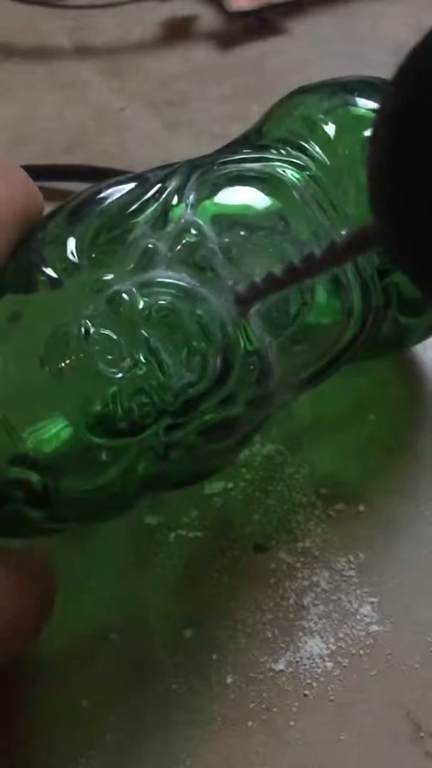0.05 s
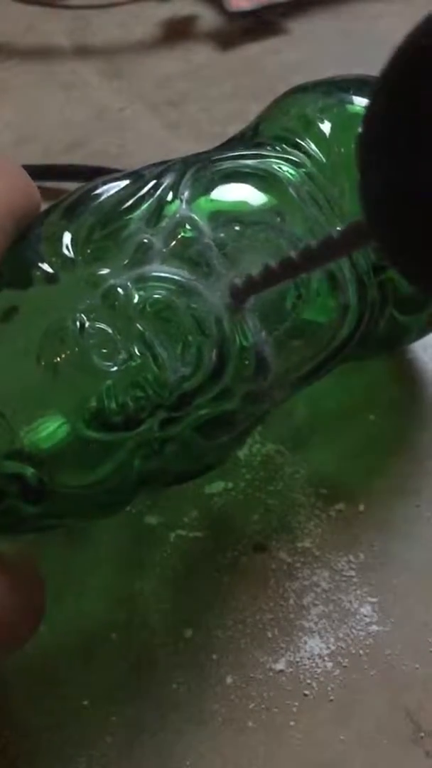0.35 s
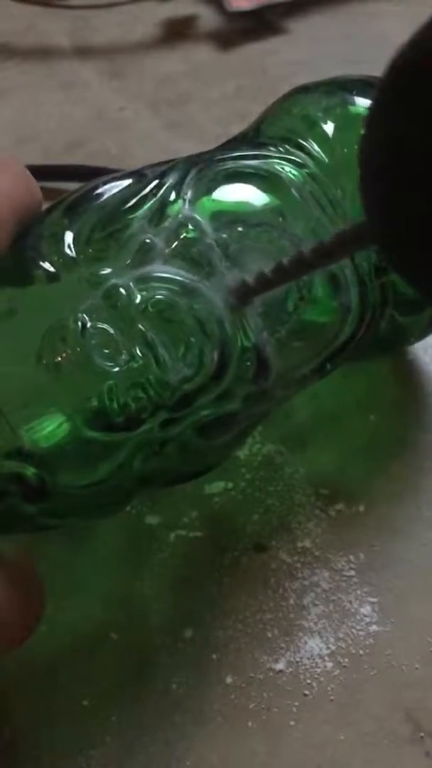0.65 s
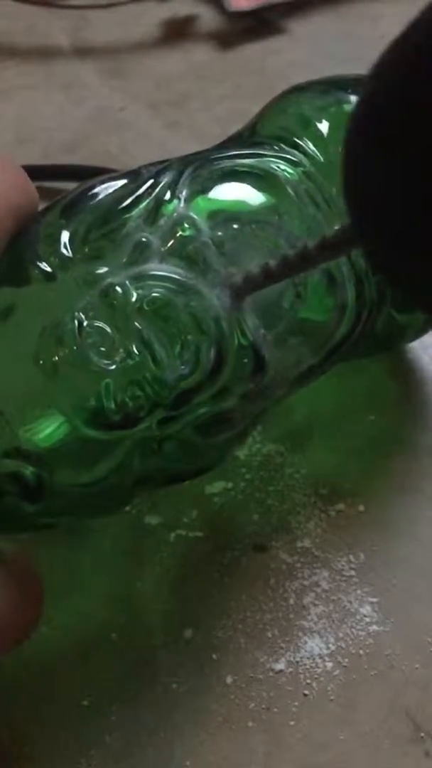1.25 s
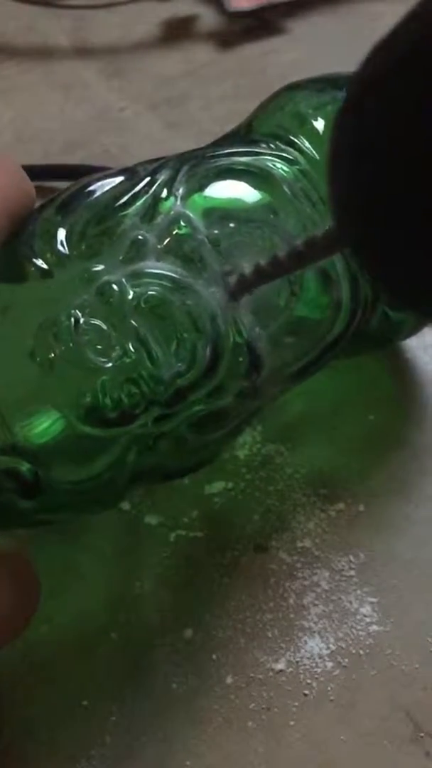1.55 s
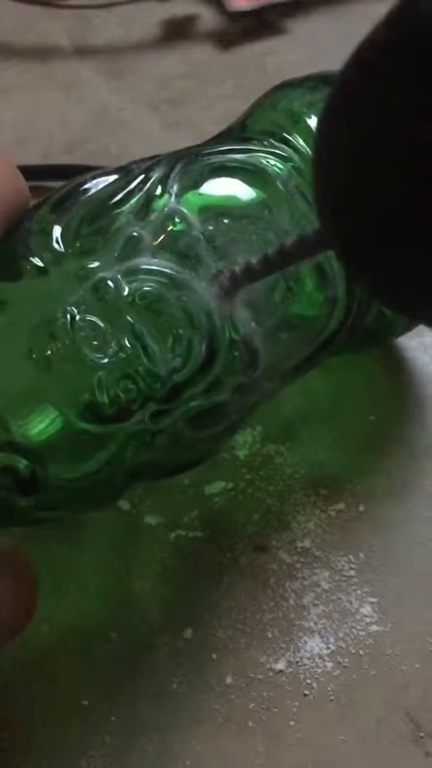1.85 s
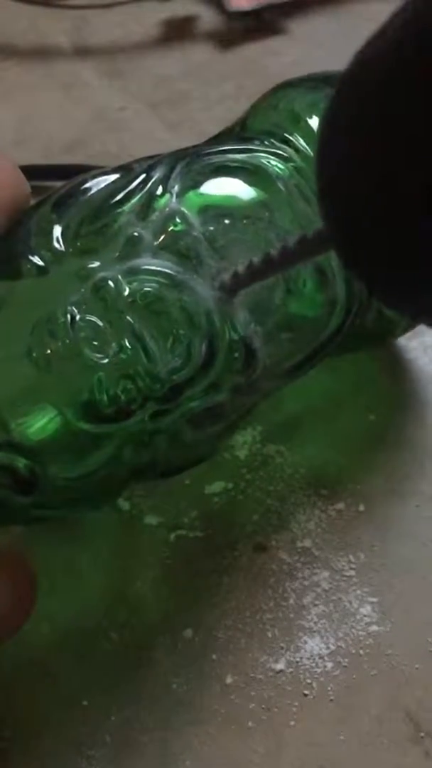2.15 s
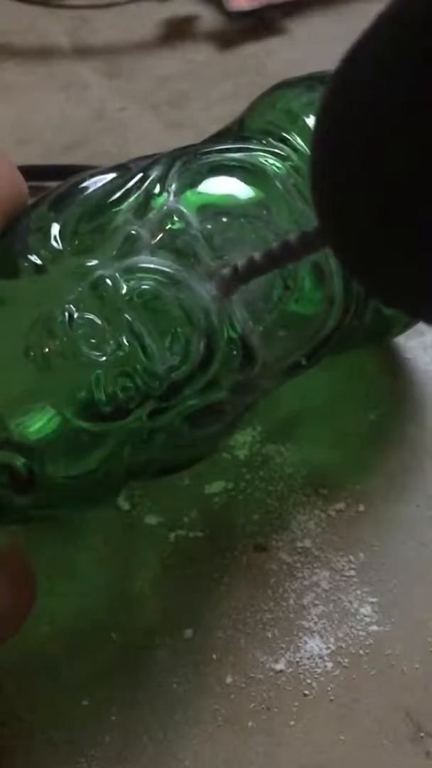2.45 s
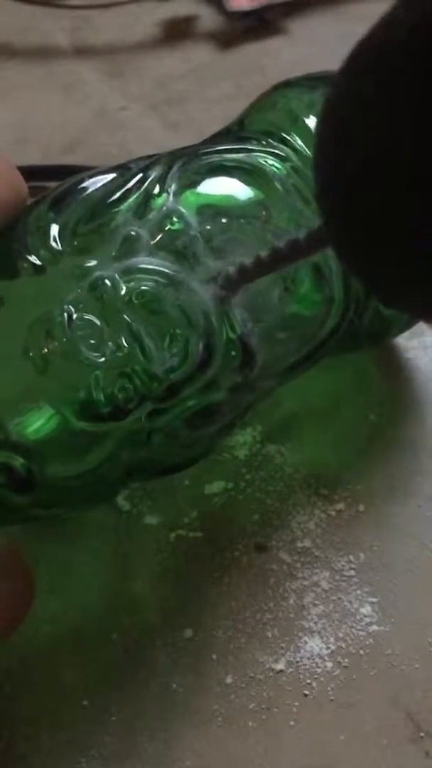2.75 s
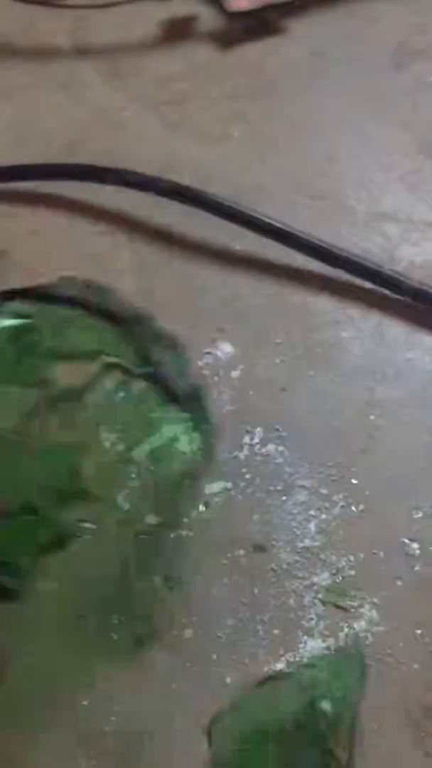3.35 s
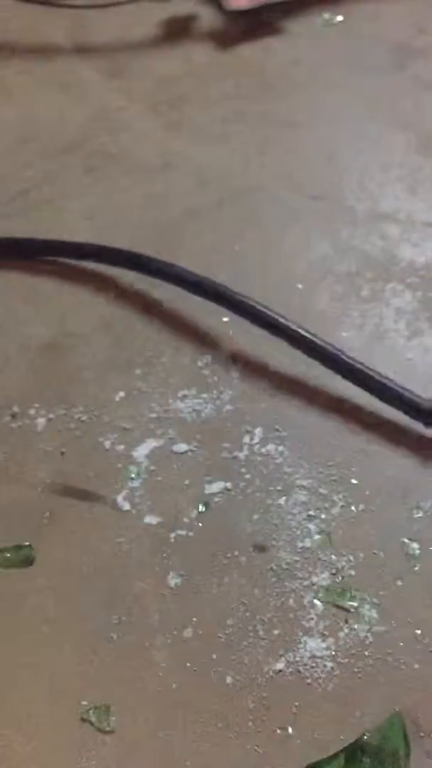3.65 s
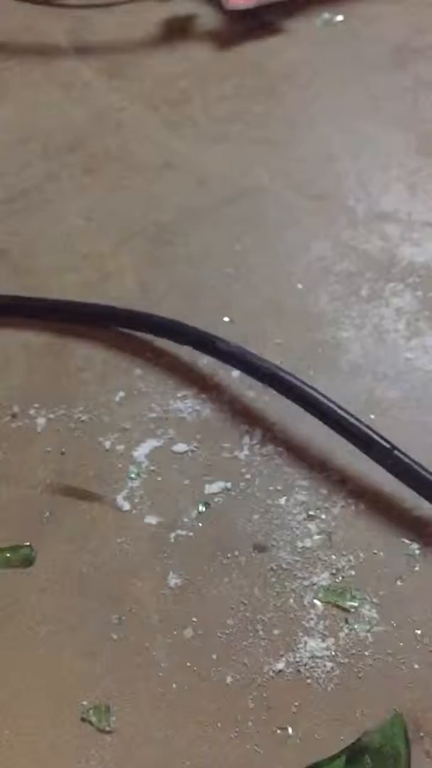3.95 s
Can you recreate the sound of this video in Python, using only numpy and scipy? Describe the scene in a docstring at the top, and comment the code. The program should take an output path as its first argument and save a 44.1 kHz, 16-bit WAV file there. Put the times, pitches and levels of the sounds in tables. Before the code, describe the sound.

A whining drill bores harshly into glass, then the bottle shatters and pieces tinkle down.

```python
"""A harsh, pulsing grind over a motor's whine: an electric drill bores into a hand-held glass bottle,
close by in a small room. The two lips of the bit crush glass on every turn, exciting the resonances
of bottle and bit, and the whine sags under load. The bit screeches and snags, the bottle bursts and
overloads the microphone, and shards ring in their own modes on the table while the drill runs down."""
import sys
import numpy as np
from scipy import signal
from scipy.fft import rfft, irfft
from scipy.io import wavfile
from scipy.ndimage import uniform_filter1d

SR = 44100
rng = np.random.default_rng(int(sys.argv[2]) if len(sys.argv) > 2 else 0)


def wav_out(sig):
    """Save sig, one row per channel (or a flat mono array), as 16-bit PCM at SR to the path in sys.argv[1]."""
    wavfile.write(sys.argv[1], SR, np.round(np.clip(np.atleast_2d(sig).T, -1, 1) * 32767).astype(np.int16))


N = 176400

# Envelopes of the grinding in rumble, bottle and bit: t/s, relative level/dB
RUMBLE_ENVELOPE = [(0.0, -40), (0.36, -44.5), (1.69, -38.5), (2.26, -41), (2.35, -39), (3.2, -40.5)]
BOTTLE_ENVELOPE = [(0, -25.5), (.22, -24), (.5, -25.5), (1.0, -26), (1.45, -23.2), (1.85, -23.2),
                   (2.15, -25.3), (2.5, -24), (3.1, -22.5), (3.22, -25)]
BIT_ENVELOPE = [(0, -21.5), (.45, -21), (1.0, -19.5), (2.2, -20.5), (3.0, -19), (3.22, -18)]
# Their spectra: f/Hz, relative level/dB
RUMBLE_SPECTRUM = [(25, -44), (50, -19), (85, -5.5), (170, -2), (280, 1), (400, -4.5), (700, -14)]
BOTTLE_SPECTRUM = [(450, -15), (750, -13), (1250, -8.5), (1450, 2.5), (1750, 0), (2300, -6.5), (3050, -3.5),
                   (3400, -17.5), (4000, -10.5)]
BIT_SPECTRUM = [(3500, -2), (4250, -4.5), (4700, -1), (5900, 1), (6700, 1.5), (7500, -4.5), (8400, -1.5),
                (8700, 0), (8900, 11), (9200, -2), (10100, 3), (10600, -8), (11400, -12.5), (12200, -15.5),
                (12500, -1.5), (13100, -19), (13480, -1), (13750, -11), (14200, 2), (14800, -30),
                (15800, -1)]
# Their modulation by band:
# lower f/Hz, upper f/Hz, bite peak/turns, bite depth/dB, wobble peak/turns, wobble depth/dB
RUMBLE_SWELLS = [(20, 730, 0.32, 3.1, 0.52, 0.47)]
BOTTLE_SWELLS = [(550, 2395, 0.22, 1.2, 1, 1.3), (2250, 3910, 0.077, 0, 0.99, 0.5)]
BIT_SWELLS = [(3900, 5600, .08, 2.2, .9, 2.4), (5600, 7500, .15, 1.9, .76, 1.5),
              (7500, 9600, .03, .9, .4, .3), (9600, 11500, .11, 3.6, .15, .5),
              (11500, 13800, .02, 1.6, .8, 1.2), (13800, 17000, .42, 2.4, .5, .5)]
RUMBLE_DB, BOTTLE_DB, BIT_DB = 8, -0.8, -1.5
GRAINS_PER_S, GRAIN_SPREAD_DB, CHATTER_DB, SURGE_DB = 11000, 2.5, 1.1, .5
# Narrow resonances of the glass under the bit: f/Hz, bandwidth/Hz, rms level/dB
GLASS_MODES = [(1450, 110, -35), (3070, 130, -40), (4230, 120, -37.5), (9350, 180, -33)]
MODE_BITE_TURNS, MODE_BITE_DB, MODE_FLICKER_DB = .19, 5, 3.5

# Rotation rate of the motor shaft: t/s, f/Hz
SHAFT_SPEED = [(0.0, 180.9), (0.37, 163.5), (0.75, 151.3), (1.08, 143.1), (1.46, 176.3), (1.58, 181.3),
               (1.69, 182.7), (1.85, 174.4), (2.22, 140.0), (2.3, 138.6), (2.64, 166.4), (2.87, 177.0),
               (3.06, 182.0), (3.24, 175.6)]
GEAR_RATIO = 9.768
# Partials of the whine: multiple of the shaft rate, rms level off resonance/dB
MOTOR_HARMONICS = [(1, -44.5), (8, -42.5), (12, -32.6), (20, -47), (24, -47)]
WHINE_WANDER, WHINE_FLUTTER_DB = .0016, 1.6
SING_HZ, SING_WIDTH_HZ, SING_DB = 1440, 130, 10  # the bottle's main resonance

# Catches of the lips on the rim of the hole: position/turns, f/Hz, level/dB, T60/s
RIM_CATCHES = [(.04, 4750, -13, .022), (.12, 10150, -12.5, .024), (.42, 9000, -15, .024),
               (.52, 4600, -19, .018), (.56, 10500, -17, .018), (.68, 1400, -18, .03),
               (.4, 14200, -27, .03)]
CATCH_RISE_S, CATCH_SPREAD_DB, CATCH_DETUNE, CATCH_JITTER_TURNS = .0015, 2.2, .025, .02
CATCH_GRIT_RAD = .17  # rms phase step per sample at 5 kHz
# Hard bites that knock the bottle: t/s, level/dB
HARD_BITES = [(.04, -20), (.148, -16.5), (.204, -15), (.263, -17), (.322, -16), (.386, -18), (.441, -19.5),
              (.474, -22), (.626, -20), (.692, -18), (1.082, -21), (1.619, -20), (1.781, -21), (1.89, -19),
              (2.074, -22), (2.205, -18), (2.273, -20.5), (2.487, -19.5), (2.537, -21), (2.687, -20)]
# Response of the hollow body to a knock: f/Hz, relative level/dB
KNOCK_SPECTRUM = [(700, -27), (1150, -6.5), (1400, 3.5), (1700, -4), (2500, -26), (8000, -37)]
SCREECH_HZ, SCREECH_WIDTH_HZ, SCREECH_DB, SCREECH_SWELL_S = 8820, 150, -22.5, 0.23
SNAG_S, SNAG_DECAY_S, SLIP_DB = 3.235, 0.0027, -16.5

# Breaking of the bottle: t/s, crack level/dB, relative thump level/dB, crack decay time/s
FRACTURES = [(3.272, -2.5, -4.5, 0.0095), (3.280, -12, 0, 0.0055), (3.2867, -17, -5.5, .003),
             (3.303, -12, -7, 0.0063), (3.3083, -14.5, -18, 0.0055), (3.32, -17.5, -9.5, 0.0086),
             (3.330, -22, -24, 0.025), (3.376, -28, -28, 0.006), (3.847, -38, -33.5, 0.0071)]
BURST_S = FRACTURES[0][0]
# Spectrum of a crack: f/Hz, relative level/dB
CRACK_SPECTRUM = [(200, -6), (700, -6.5), (1300, -3.5), (2200, 0.5), (3400, 0.5), (4400, -6), (5500, -3),
                  (8000, -6.5), (13500, -7), (15500, -13)]
THUMP_SWEEP_HZ, THUMP_END_HZ, THUMP_FALL_S, THUMP_DECAY_S, THUMP_DB = 680, 51.6, 0.00745, .014, -3.5

# Normal modes of each piece of glass: f/Hz, relative level/dB, T60/s
SHARD_MODES = { "wall": [(4171, 3.5, 0.34)], "large": [(2795, -4, 0.31), (4510, -3.5, 0.27),
               (5232, -13, 0.31), (5405, -15, 0.16), (6550, 1, 0.15), (7050, -0.5, 0.12),
               (9970, -0.5, 0.11)], "neck": [(3360, 0.5, 0.18), (5190, -1, 0.062), (5405, -3, 0.22)],
               "splinter": [(13260, 1, 0.068)], "sliver": [(12900, -0.5, 0.1)], "chip": [(11130, -1, .09)],
               "curved": [(1840, -10.5, 0.5), (2870, -3, 0.19), (3040, -0.5, 0.53), (6277, 0, 0.13),
               (6990, 5, 0.09), (9900, 14.5, 0.04), (11200, 16, 0.05)], "flat": [(3590, 0.5, 0.31),
               (4545, -3.5, 0.4), (5350, -0.5, 0.25), (5900, -10, 0.43), (8096, -7.5, 0.32), (9840, -5, .1),
               (11100, -4.5, 0.089), (13100, -2, 0.14)], "small": [(7260, -2, 0.18), (9740, -16, 0.4)],
               "thin": [(5590, 1.5, 0.17), (9850, -4, 0.36), (10500, -1, 0.075)], "base": [(1333, 1, 0.085),
               (3480, 2.5, 0.061), (3624, -7, 0.78)]}
# Impacts of the pieces: t/s, piece, ring level/dB, most excited f/Hz, tick level/dB
SHARD_IMPACTS = [(3.227, "wall", -22.5, 4200, -35), (3.292, "neck", -8, 4800, -31),
                 (3.325, "large", -9, 5330, -23), (3.371, "splinter", -7, 13200, -30),
                 (3.4707, "large", -25.5, 7000, -18), (3.496, "large", -24, 4600, -43),
                 (3.595, "large", -29.5, 5000, -24), (3.6105, "large", -21, 8800, -38),
                 (3.6721, "curved", -23.5, 4040, -23), (3.708, "flat", -20, 6500, -29),
                 (3.724, "small", -30, 7000, -32), (3.729, "sliver", -19, 12970, -28),
                 (3.7498, "small", -13, 7250, -15.5), (3.771, "flat", -23, 6100, -23),
                 (3.787, "curved", -28.5, 2530, -38), (3.812, "flat", -21, 3310, -31),
                 (3.846, "flat", -23, 12000, -32), (3.8748, "thin", -18.5, 6550, -22),
                 (3.897, "chip", -25, 11000, -40), (3.9414, "base", -19, 3020, -24)]
# Spectrum of a contact tick: f/Hz, relative level/dB
TICK_SPECTRUM = [(200, -18), (900, -15), (2000, 2.5), (6000, 6.5), (10000, -8), (15000, -8)]
FOCUS_DB_PER_OCTAVE, TICK_DECAY_S = 11, 0.0033
ROCK_PER_S, ROCK_DB, TWIN_SPREAD_HZ, TWIN_DB = 130, 2.2, 45, -10
CRUMBS_PER_S, CRUMB_MIN_DB, CRUMB_T60_S = 150, -46, 0.077

# Spectrum of the drill's airy whirr: f/Hz, relative level/dB
WHIRR_SPECTRUM = [(30, -24), (140, -20.5), (600, -16.5), (1200, -9.5), (3200, -5), (6500, -10),
                  (15000, -22.5)]
WHIRR_DB, COAST_HZ, COAST_DB, RUN_DOWN_DB_PER_S = -33.5, 150, -55.5, -10.5
ROOM_T60_S, ROOM_DB = 0.16, -15.5
LOW_CUT_HZ, TOP_HZ, OVERLOAD_AMPLITUDE = 43, 15800, .68


def grinding(t, turns):
    """Impulse excitation: crushed grains drive bottle and bit, modulated by bites and wobble."""
    sizes = undb(GRAIN_SPREAD_DB * np.minimum(rng.exponential(size=N), 6)) * rng.choice([-1, 1], N)
    grains = (rng.random(N) < GRAINS_PER_S / SR) * sizes
    grains *= undb(CHATTER_DB * wander(450) + SURGE_DB * wander(29.7))
    rumble = rotary_swell(colour(grains, RUMBLE_SPECTRUM), turns, RUMBLE_SWELLS, flicker_db=1.0)
    bottle = rotary_swell(colour(grains, BOTTLE_SPECTRUM), turns, BOTTLE_SWELLS, flicker_db=-0.2)
    bit = rotary_swell(colour(grains, BIT_SPECTRUM), turns, BIT_SWELLS, flicker_db=1.5)
    bites = grains * undb(MODE_BITE_DB * np.cos(4 * np.pi * (turns - MODE_BITE_TURNS)))
    ringing = sum(undb(db) * resonate(bites * undb(MODE_FLICKER_DB * wander(21.96)), hz, width)
                  for hz, width, db in GLASS_MODES)
    return (rumble * undb(curve(t, RUMBLE_ENVELOPE) + RUMBLE_DB)
            + bottle * undb(curve(t, BOTTLE_ENVELOPE) + BOTTLE_DB)
            + bit * undb(curve(t, BIT_ENVELOPE) + BIT_DB) + ringing)


def rotary_swell(sound, turns, bands, flicker_db):
    """Amplitude modulation: two lips bite and the bit wobbles once in every turn."""
    sound, out = unit_rms(sound), np.zeros(N)
    for lo_hz, hi_hz, bite_at, bite_db, wobble_at, wobble_db in bands:
        bite = bite_db * np.cos(4 * np.pi * (turns - bite_at))
        wobble = wobble_db * np.cos(2 * np.pi * (turns - wobble_at))
        out += band(sound, lo_hz, hi_hz) * unit_rms(undb(bite + wobble + flicker_db * wander(70)))
    return out


def motor(shaft_hz):
    """Forced vibration: shaft, fan and armature harmonics swell near the bottle's main resonance."""
    phase = 2 * np.pi * np.cumsum(shaft_hz * (1 + WHINE_WANDER * wander(70))) / SR
    out = np.zeros(N)
    for order, db in MOTOR_HARMONICS:
        resonance_db = SING_DB / (1 + (2 * (order * shaft_hz - SING_HZ) / SING_WIDTH_HZ) ** 2)
        rms = undb(db + resonance_db + WHINE_FLUTTER_DB * wander(60))
        out += np.sqrt(2) * rms * np.sin(order * phase + rng.uniform(0, 2 * np.pi))
    return out


def catches(t, turns):
    """Periodic impacts: near the same places in every turn a lip chips the rim, which rings."""
    out, age = np.zeros(N), t[:SR // 20]
    attack = 1 - np.exp(-age / CATCH_RISE_S)
    for turn, chance in enumerate(rng.standard_normal((int(turns[-1]), len(RIM_CATCHES), 3))):
        for (place, hz, db, t60), (lag, detune, size) in zip(RIM_CATCHES, chance):
            start = np.interp(turn + place + CATCH_JITTER_TURNS * lag, turns, t)
            tone = scrape(age, hz * (1 + CATCH_DETUNE * detune), t60)
            add(out, start, undb(db + CATCH_SPREAD_DB * size) * tone * attack)
    return out


def scrape(age, hz, t60):
    """Phase diffusion: grit jostles a short ring, the more so the higher its frequency."""
    jostle = CATCH_GRIT_RAD * np.sqrt(hz / 5000) * np.cumsum(rng.standard_normal(len(age)))
    return np.sin(2 * np.pi * hz * age + jostle) * damping(age, t60)


def knocks(t):
    """Transient response: a lip digs in and rattles the hollow body."""
    push = sum(undb(db) * pulse(t, start, decay_s=0.0098) for start, db in HARD_BITES)
    return colour(push * rng.standard_normal(N), KNOCK_SPECTRUM)


def screech(t):
    """Friction drives a narrow resonance, which grows exponentially as the bit binds."""
    rub = band(rng.standard_normal(N), SCREECH_HZ - SCREECH_WIDTH_HZ, SCREECH_HZ + SCREECH_WIDTH_HZ)
    growth = np.exp(np.minimum(t - SNAG_S, 0) / SCREECH_SWELL_S)
    return undb(SCREECH_DB) * resonate(rub, SCREECH_HZ, SCREECH_WIDTH_HZ) * growth


def cracks(t):
    """Brittle fracture: each crack through the bottle radiates a rough pulse of noise."""
    envelope = sum(undb(db) * pulse(t, start, decay_s) for start, db, _, decay_s in FRACTURES)
    return colour(envelope * rng.standard_normal(N) * undb(3.6 * wander(900)), CRACK_SPECTRUM)


def thumps(t):
    """Dispersion: heavy pieces bend the table; high frequencies arrive first, so the pitch falls."""
    out, age = np.zeros(N), t[:SR // 4]
    for start, _, db, _ in FRACTURES:
        hz = THUMP_END_HZ + THUMP_SWEEP_HZ * np.exp(0.159 * rng.standard_normal() - age / THUMP_FALL_S)
        chirp = np.sin(2 * np.pi * np.cumsum(hz) / SR)
        add(out, start, undb(THUMP_DB + db) * chirp * np.exp(-age / THUMP_DECAY_S))
    return out


def shards(t):
    """Free vibration: each impact ticks and rings its piece's modes; crumbs tinkle in between."""
    out, ticks, age = np.zeros(N), np.zeros(N), t[:SR // 2]
    for start, piece, db, focus_hz, tick_db in SHARD_IMPACTS:
        for hz, mode_db, t60 in SHARD_MODES[piece]:
            off_focus_db = FOCUS_DB_PER_OCTAVE * abs(np.log2(hz / focus_hz))
            add(out, start, undb(db + mode_db - off_focus_db) * shard_mode(age, hz, t60))
        ticks += undb(tick_db) * pulse(t, start, TICK_DECAY_S)
    span_s = t[-1] - BURST_S
    for when, pitch, size in rng.random((int(CRUMBS_PER_S * span_s), 3)):
        crumb = ring(age, 9000 + 6000 * pitch, CRUMB_T60_S)
        add(out, BURST_S + when * span_s, undb(CRUMB_MIN_DB + 14 * size) * crumb)
    return out + colour(ticks * rng.standard_normal(N), TICK_SPECTRUM)


def shard_mode(age, hz, t60):
    """Mode splitting: an uneven shard rings as a beating pair, and flutters as it rocks."""
    steps = np.arange(0, age[-1], 1 / ROCK_PER_S)
    rocking_db = ROCK_DB * np.interp(age, steps, rng.standard_normal(len(steps)))
    twin_hz = hz + TWIN_SPREAD_HZ * rng.standard_normal()
    twin = undb(TWIN_DB) * ring(age, twin_hz, t60) * rng.choice([-1, 1])
    return (ring(age, hz, t60) + twin) * undb(rocking_db)


def whirr(t):
    """Exponential run-down: at the burst a shaft hum joins the drill's steady air noise; both fade."""
    since = np.maximum(t - BURST_S, 0)
    air = unit_rms(colour(rng.standard_normal(N) * undb(0.84 * wander(120)), WHIRR_SPECTRUM))
    hum = np.sin(2 * np.pi * COAST_HZ * since)
    return (undb(WHIRR_DB) * air + undb(COAST_DB) * hum) * undb(RUN_DOWN_DB_PER_S * since)


def room(t, direct):
    """Reverberation: diffuse reflections begin after 4 ms and decay exponentially."""
    age = t[:SR // 2]
    response = rng.standard_normal(len(age)) * damping(age, ROOM_T60_S) * (age > .004)
    return undb(ROOM_DB) * signal.fftconvolve(direct, response / np.linalg.norm(response))[:N]


def colour(x, spectrum):
    """Minimum-phase filter through (f/Hz, level/dB) points; it conserves the power of white noise."""
    hz, db = np.array(spectrum).T
    gain = unit_rms(undb(np.interp(np.log(np.arange(N // 2 + 1) * SR / N + 1), np.log(hz), db)))
    cepstrum = irfft(np.log(gain), N)
    cepstrum[1:N // 2] *= 2  # folding onto positive time makes the filter causal
    cepstrum[N // 2 + 1:] = 0
    response = irfft(np.exp(rfft(cepstrum)), N)[:N // 20]
    return signal.fftconvolve(x, response)[:N]


def band(x, lo_hz, hi_hz):
    """Steep zero-phase band-pass filter."""
    hz = np.arange(N // 2 + 1) * SR / N
    return irfft(rfft(x) / np.sqrt((1 + (hz / hi_hz) ** 40) * (1 + (lo_hz / (hz + 1)) ** 20)), N)


def resonate(x, hz, width_hz):
    """Response of a second-order resonator, at unit rms."""
    return unit_rms(signal.lfilter(*signal.iirpeak(hz, hz / width_hz, fs=SR), x))


def wander(rate_hz):
    """Smooth random fluctuation of unit rms."""
    hold = max(int(SR / rate_hz), 1)
    steps = np.repeat(rng.standard_normal(N // hold + 1), hold)
    return unit_rms(uniform_filter1d(steps, hold)[:N])


def pulse(t, start, decay_s):
    """Sudden onset, exponential decay."""
    return (t >= start) * np.exp(-np.maximum(t - start, 0) / decay_s)


def ring(age, hz, t60):
    """Damped harmonic oscillation."""
    return np.sin(2 * np.pi * hz * age) * damping(age, t60)


def damping(age, t60):
    return np.exp(-np.log(1000) * age / t60)


def undb(db):
    return 10 ** (np.asarray(db) / 20)


def unit_rms(x):
    return x / np.sqrt(np.mean(x ** 2))


def curve(t, rows):
    return np.interp(t, *np.array(rows).T)


def add(out, start, sound):
    i = int(start * SR)
    out[i:i + len(sound)] += sound[:N - i]


def scene():
    """Superposition: drilling, which drops at the snag and ends at the burst, then breaking glass."""
    t = np.arange(N) / SR
    shaft_hz = curve(t, SHAFT_SPEED)
    turns = np.cumsum(shaft_hz) / SR / GEAR_RATIO  # of the bit
    snag = np.exp(-np.maximum(t - SNAG_S, 0) / SNAG_DECAY_S)
    contact = np.maximum(snag, undb(SLIP_DB) * (t < BURST_S))
    drilling = motor(shaft_hz) + grinding(t, turns) + catches(t, turns) + knocks(t) + screech(t)
    direct = contact * drilling + thumps(t) + cracks(t) + shards(t) + whirr(t)
    return (direct + room(t, direct))[None]


def record(dry):
    """Saturation: the microphone flattens the loudest peaks; deep bass and extreme treble are cut."""
    dry = signal.sosfilt(signal.butter(4, LOW_CUT_HZ, "high", fs=SR, output="sos"), dry)
    saturated = dry / (1 + (dry / OVERLOAD_AMPLITUDE) ** 4) ** .25
    return signal.sosfilt(signal.ellip(10, .2, 80, TOP_HZ, fs=SR, output="sos"), saturated)


dry = scene()
out = record(dry)
wav_out(out)
```